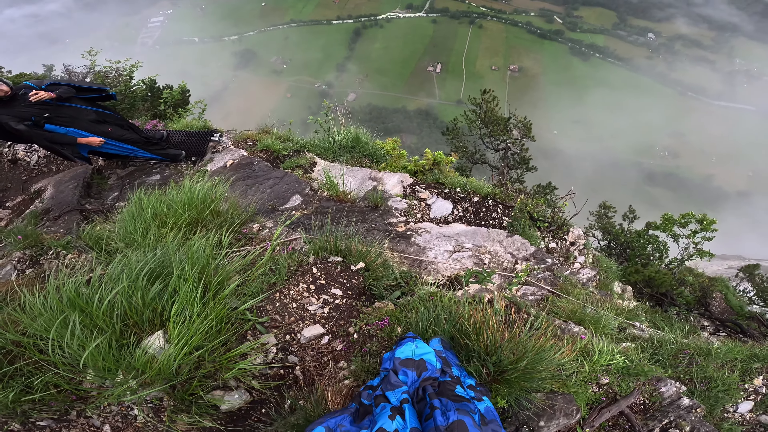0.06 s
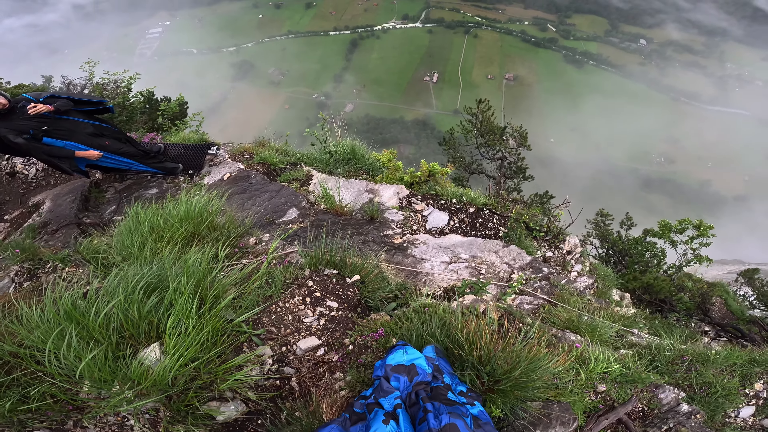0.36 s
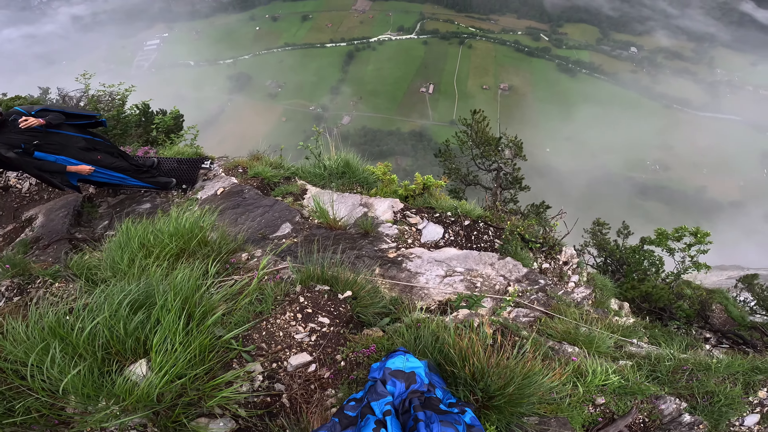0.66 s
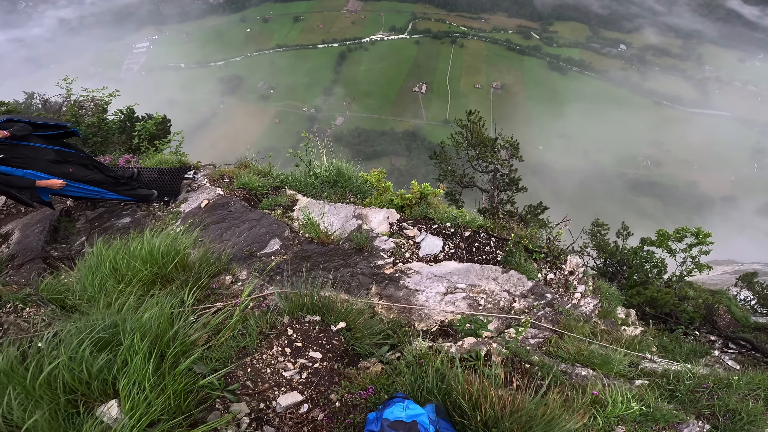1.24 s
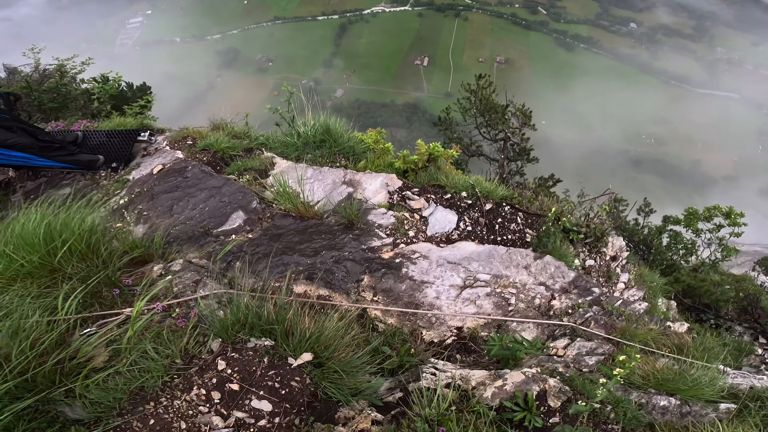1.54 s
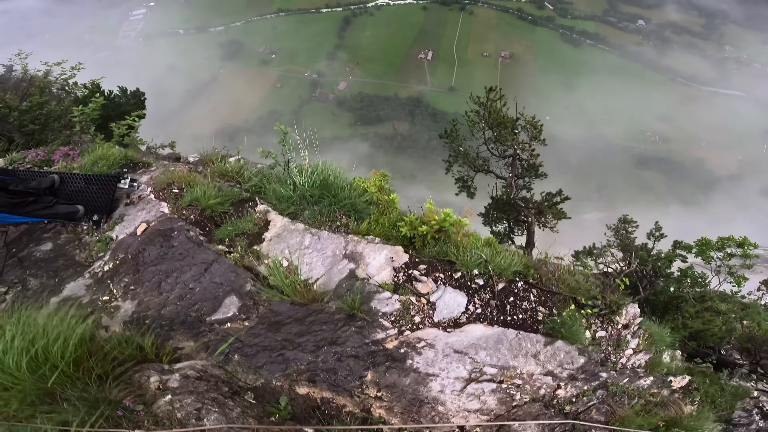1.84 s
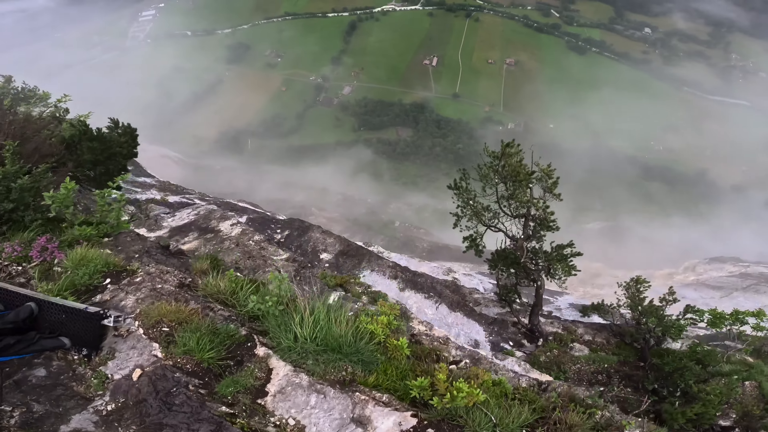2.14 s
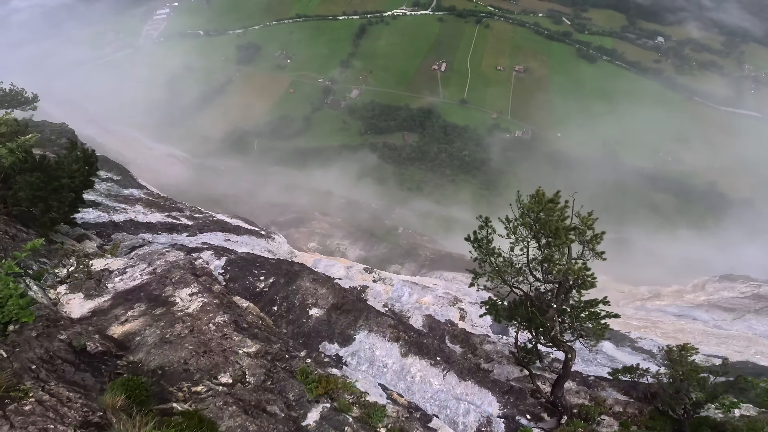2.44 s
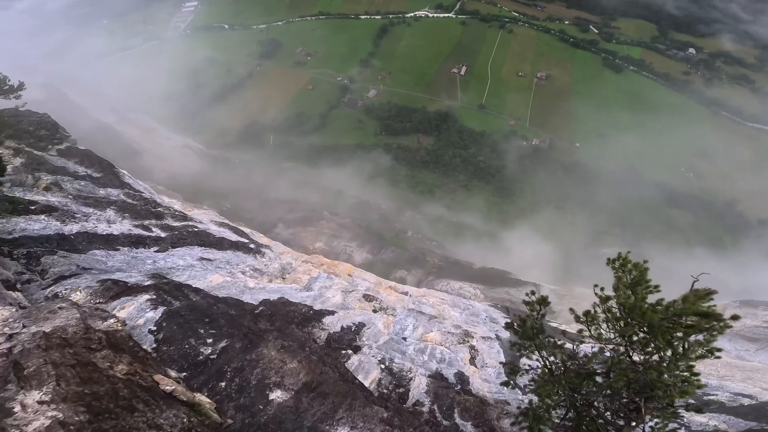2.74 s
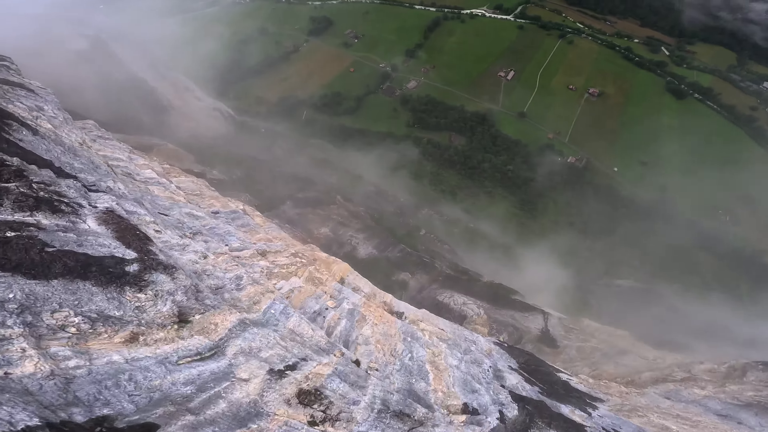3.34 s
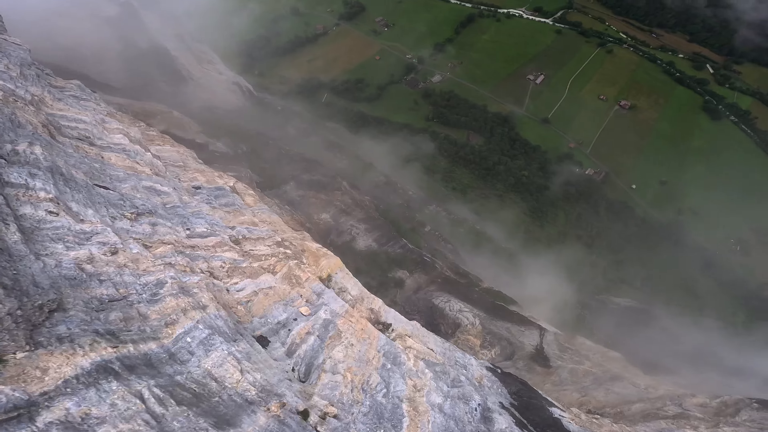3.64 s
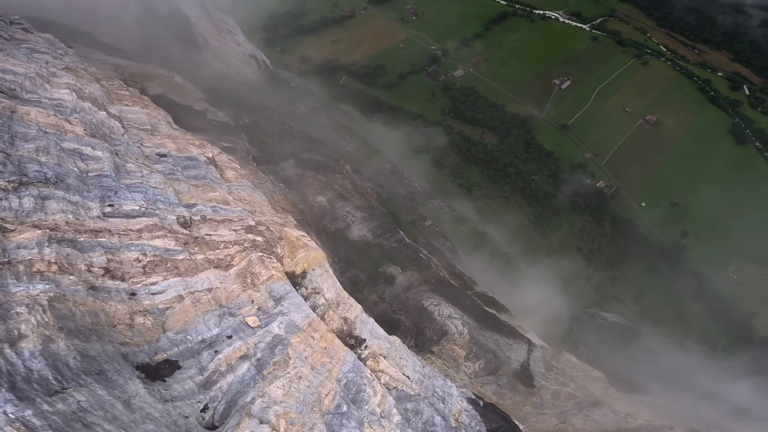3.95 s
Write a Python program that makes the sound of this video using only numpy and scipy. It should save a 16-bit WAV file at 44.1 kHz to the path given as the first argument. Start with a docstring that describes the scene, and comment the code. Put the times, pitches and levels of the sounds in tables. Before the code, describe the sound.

Wind rushes and buffets the microphone, building after footsteps and flapping suit fabric.

```python
"""Wind on a helmet microphone, worn by a jumper in a nylon suit who leaps from a cliff edge.
At the edge, the hush of the valley lies far below. Close by, cloth swishes, steps thud through
the body, a piece of gear clicks, and the suit flaps as it fills with air. Then the fall gathers
speed: eddies buffet the microphone, the rush grows louder and brighter, the image closes to mono."""
import sys
import numpy as np
from scipy import signal
from scipy.fft import rfft, irfft, next_fast_len
from scipy.io import wavfile
from scipy.ndimage import map_coordinates

SR = 44100
rng = np.random.default_rng(int(sys.argv[2]) if len(sys.argv) > 2 else 0)


def to_wav(sig):
    """Store sig (one row per channel, or 1-D mono) as 16-bit WAV at the path in sys.argv[1].

    Samples outside -1..1 are clipped; the rate is SR.
    """
    pcm = np.clip(np.atleast_2d(sig), -1, 1) * 32767
    pcm = np.round(pcm).astype(np.int16)
    wavfile.write(sys.argv[1], SR, pcm.T)  # frames by channels


N = 176400

# likeness of the two channels for valley, cloth and grit (f/Hz, correlation)
NEAR_MONO = [(30, 1), (1000, 0.87), (4000, 0.94), (8000, 0.9)]
# likeness of the two channels for wind at the microphone (f/Hz, correlation)
WIND_ALIKE = [(30, 1), (300, 0.71), (1000, 0.99), (4000, 1), (10000, .99)]


def amp(db):
    """Decibels to gain."""
    return 10 ** (np.asarray(db) / 20)


def unit(x):
    """Scale to rms 1."""
    return x / np.sqrt(np.mean(x ** 2) + 1e-20)


def along(points, hz):
    """Interpolate (f/Hz, value) points on a log frequency axis."""
    f, v = np.transpose(points)
    return np.interp(np.log(hz + 1), np.log(f + 1), v)


def curves(rows):
    """One value per sample for each column after the time."""
    times, *columns = np.transpose(rows)
    return [np.interp(np.arange(N) / SR, times, column) for column in columns]


def filtered(x, response):
    """Shape the spectrum of x by a response, a function of frequency."""
    size = next_fast_len(N + 8192)
    hz = np.fft.rfftfreq(size, 1 / SR)
    return irfft(rfft(x, size) * response(hz), size)[..., :N]


def rush(spectrum, alike):
    """Coloured stereo noise of rms 1; alike sets the left-right correlation."""
    def response(hz):
        angle = np.arccos(np.clip(along(alike, hz), -1, 1)) / 2
        return amp(along(spectrum, hz)) * [np.cos(angle), np.sin(angle)]
    mid, side = filtered(rng.standard_normal((2, N)), response)
    return unit(np.array([mid + side, mid - side]))


def churn(depth_db, rate):
    """A smooth random gain of rms 1, with rate knots a second."""
    knots = rng.standard_normal(int(N * rate / SR) + 4)
    wobble = map_coordinates(knots, [np.arange(N) * rate / SR])
    return unit(amp(depth_db * wobble))


def burst(t, attack_s, t60_s):
    """A quick rise and an exponential decay."""
    return (1 - np.exp(-t / attack_s)) * amp(-60 * t / t60_s)


def pan(right_db):
    """Left and right gains with a mean of 1."""
    gains = amp(np.array([-right_db, right_db]) / 2).reshape(2, -1)
    return gains / gains.mean(0)


def add(track, s, sound):
    """Mix a sound into a track at time s."""
    part = track[..., round(s * SR):][..., :sound.shape[-1]]
    part += sound[..., :part.shape[-1]]


def valley():
    """Air and water far below the edge reach the microphone as a hush."""
    # swell of the hush (t/s, level/dB)
    swell = [(0, -49.5), (.3, -45.5), (1.0, -43), (1.6, -41), (1.95, -42.5), (2.15, -45), (2.4, -42),
             (4, -43)]
    # spectrum of the hush (f/Hz, level/dB)
    spectrum = [(60, -21), (200, 3.5), (400, -0.5), (600, -1), (1200, -3.5), (1800, -11), (2500, -22.5),
                (4000, -40.5), (8000, -54), (14000, -67)]
    level_db, = curves(swell)
    return amp(level_db) * rush(spectrum, NEAR_MONO) * pan(right_db=2)


def suit():
    """Just below the helmet, nylon rubs in a grainy swish, slides brightly or snaps at a crease."""
    # rubbing of the suit (t/s, relative level/dB)
    rubbing = [(0, -67.5), (.12, -63), (.21, -61), (.26, -62), (.38, -63.5), (.43, -64.5), (.475, -69.5),
               (.535, -60), (.575, -61), (.685, -54.5), (.78, -69), (.83, -65.5), (.87, -78), (.94, -78),
               (.99, -64), (1.14, -63.5), (1.21, -59), (1.29, -61), (1.55, -48), (1.8, -54.5), (1.97, -56),
               (2.02, -65), (2.09, -58), (2.2, -66.5), (2.33, -75), (2.6, -70)]
    # creases snapping (t/s, level/dB)
    creases = [(.69, -45), (.810, -51), (1.213, -49), (1.841, -49), (2.151, -44)]
    # quick slides of nylon on nylon (t/s, level/dB, half length/s)
    slides = [(0.212, -61.5, .016), (0.434, -63, 0.009), (.535, -58, .012), (1.505, -56, .008),
              (1.555, -56.5, .02), (2.098, -76, 0.014)]
    # spectrum of rubbing and creases (f/Hz, level/dB)
    cloth_spectrum = [(100, -5), (300, 20), (800, 4.5), (1500, 7.5), (2500, 6.5), (4000, 2), (6000, -1),
                      (7600, -2.5), (8400, -8.5), (10500, -13.5), (12500, -18), (15000, -31)]
    # spectrum of the slides (f/Hz, level/dB)
    slide_spectrum = [(2500, -31), (5000, -7), (6600, 4), (8300, -10), (10300, -6.5), (12000, -22),
                      (15000, -49)]
    rub_db, = curves(rubbing)
    snaps, t = np.zeros(N), np.arange(N) / SR
    for s, db in creases:
        add(snaps, s, amp(db) * burst(t[:SR // 10], attack_s=0.00092, t60_s=0.018))
    swish = amp(rub_db + 7.5) * churn(depth_db=1, rate=70) * churn(depth_db=1, rate=430)
    sliding = sum(amp(db) * np.exp(-0.5 * ((t - s) / half) ** 2) for s, db, half in slides)
    cloth = (swish + snaps) * rush(cloth_spectrum, NEAR_MONO)
    return (cloth + sliding * rush(slide_spectrum, NEAR_MONO)) * pan(right_db=-1.5)


def steps():
    """Each step sends a dull thud through the body to the helmet; grit scuffs under the sole."""
    # steps and jolts of the body (t/s, level/dB, f/Hz)
    jolts = [(.575, -22, 85), (0.646, -27, 111), (1.076, -22, 72), (1.383, -14, 59), (1.713, -7.5, 63),
             (1.936, -9.5, 63)]
    # scuffs of a shoe on the stony path (t/s, level/dB)
    scrapes = [(.646, -26.5), (.666, -34), (1.468, -38)]
    # spectrum of the grit (f/Hz, level/dB)
    grit_spectrum = [(100, -13), (350, 6.5), (900, -2), (1500, -4), (3000, -26), (8000, -41)]
    thuds, scuffs, t = np.zeros(N), np.zeros(N), np.arange(SR // 4) / SR
    for s, db, hz in jolts:
        add(thuds, s, amp(db) * burst(t, attack_s=0.0039, t60_s=0.095) * np.sin(2 * np.pi * hz * t))
    for s, db in scrapes:
        add(scuffs, s, amp(db) * burst(t, attack_s=0.0011, t60_s=0.026))
    return thuds * pan(right_db=7) + scuffs * rush(grit_spectrum, NEAR_MONO)


def gear():
    """A hard piece of gear clicks near the microphone and rings briefly."""
    # contacts of the gear (t/s, level/dB)
    clicks = [(1.7057, -12.5), (1.7104, -24)]
    # its ringing modes (f/Hz, relative level/dB, t60/s)
    modes = [(1410, 5.5, 0.012), (1650, -2.5, .009), (2460, -3.5, 0.0095), (2740, -6, 0.0067),
             (1050, -19, 0.006), (345, -10, 0.037)]
    attack_s = 0.0004
    out, t = np.zeros(N), np.arange(SR // 20) / SR
    ring = sum(amp(db - 60 * t / t60) * np.sin(2 * np.pi * hz * t) for hz, db, t60 in modes)
    contact = 1 - np.exp(-(t / (2 * attack_s)) ** 2)
    for s, db in clicks:
        add(out, s, amp(db) * contact * ring)
    return out


def flaps():
    """Cloth whips close on the right as the suit fills: each flap is a hollow pop with a puff of air."""
    # flaps of the suit (t/s, level/dB, top of the puff's band f/Hz)
    whips = [(1.957, -12, 640), (1.971, -11.5, 750), (1.977, -8, 443), (1.985, -13, 300), (1.998, -11, 607),
             (2.004, -11.5, 403), (2.027, -15.5, 620), (2.038, -11, 413), (2.049, -12.5, 696),
             (2.058, -16.5, 840), (2.066, -19.5, 1290), (2.074, -20.5, 850), (2.089, -19.5, 750),
             (2.107, -22, 453), (2.183, -24, 460), (2.239, -23, 604), (2.26, -27, 750), (2.272, -26.5, 800),
             (2.287, -24, 646)]
    pop_hz, pop_db = 278, 0.5
    puff_low_hz, puff_db, puff_width = 111, -4, 0.34
    out, t = np.zeros((2, N)), np.arange(SR // 10) / SR
    shape = burst(t, attack_s=0.00091, t60_s=0.044)
    shape_rms = np.sqrt(np.mean(shape ** 2))
    for s, db, top_hz in whips:
        hz = pop_hz * np.exp(0.12 * rng.standard_normal())
        pop = shape * np.sin(2 * np.pi * hz * t)
        band = signal.butter(4, [puff_low_hz, top_hz], 'band', fs=SR, output='sos')
        mid, side = signal.sosfilt(band, rng.standard_normal((2, 2 * len(t))))[:, len(t):]
        air = np.array([mid + puff_width * side, mid - puff_width * side])
        puff = unit(shape * air) * shape_rms
        add(out, s, amp(db) * (amp(pop_db) * pop + amp(puff_db) * puff))
    return out * pan(right_db=11.5)


def buffet():
    """Eddies thump on the microphone, from the right at the edge, quicker and head-on in the fall."""
    # push of the air (t/s, relative level/dB)
    push = [(0, -38.5), (.1, -46.5), (.52, -43), (.6, -34), (.75, -40), (.85, -35.5), (1.0, -43.5),
            (1.12, -34), (1.27, -42), (1.4, -33.5), (1.47, -30.5), (1.6, -32), (1.68, -26.5), (1.81, -38),
            (1.93, -17.5), (2.08, -21), (2.14, -28.5), (2.23, -23.5), (2.32, -32), (2.38, -24.5),
            (2.5, -21.5), (3.2, -19.5), (4, -17.5)]
    # side from which the eddies hit (t/s, right over left/dB)
    direction = [(0, 2), (1.6, 5), (2.15, 6), (2.45, 0)]
    # eddies shrink as the speed grows (t/s, power share of the quick ones)
    quick_share = [(0, .15), (2.35, 0.15), (2.5, 0.6), (4, 0.66)]
    # rumble of the slow eddies (f/Hz, level/dB)
    rumble = [(12, -7), (25, 0), (45, 1), (75, -6.5), (110, -13), (160, -14.5), (250, -24), (1000, -95)]
    # throb of the quick eddies (f/Hz, level/dB)
    throb = [(25, -11.5), (50, -1.5), (80, -0.5), (110, -1), (150, -9), (220, -14.5), (400, -45),
             (1000, -95)]
    push_db, = curves(push)
    right_db, = curves(direction)
    quick, = curves(quick_share)
    eddies = np.sqrt(1 - quick) * rush(rumble, WIND_ALIKE) + np.sqrt(quick) * rush(throb, WIND_ALIKE)
    rounded = unit(np.tanh(0.5 * eddies))
    return amp(push_db + 1) * rounded * pan(right_db)


def airflow():
    """Air rushes past the helmet, louder and brighter with speed; turbulence shakes its upper bands."""
    # airflow in the fall (t/s, then relative level/dB of roar, hiss and low body)
    fall = [(2.4, -61, -64, -38.5), (2.5, -47, -58.5, -44), (2.65, -41.5, -63.5, -32.5),
            (2.83, -36, -54.5, -34), (3.1, -34, -47.5, -30), (3.35, -32, -44.5, -29.5),
            (3.65, -33, -43, -26), (3.8, -32.5, -42, -24), (4.0, -31, -40, -25)]
    # spectrum of the low body (f/Hz, level/dB)
    body_spectrum = [(60, -26), (130, -2), (200, -3), (300, -5.5), (450, -12), (700, -17.5), (1500, -43.5),
                     (4000, -90)]
    # spectrum of the midrange roar (f/Hz, level/dB)
    roar_spectrum = [(150, -36), (400, 1.5), (700, 0.5), (1300, -1), (2000, -8), (3000, -13), (5000, -28),
                     (9000, -61)]
    # spectrum of the hiss (f/Hz, level/dB)
    hiss_spectrum = [(800, -21), (2000, 2.5), (3000, 3.5), (4500, -2), (6000, -7.5), (7500, -17.5),
                     (10000, -25), (14000, -65)]
    # spectrum of the fizz at the top (f/Hz, level/dB)
    fizz_spectrum = [(3000, -22), (5500, 1), (7200, 4), (8300, -5), (10500, -8), (12500, -21.5),
                     (15000, -40)]
    leap_s, onset_db_per_s = 2.31, 67  # the airflow fades in up to the leap
    full_fizz_db, fizz_growth = -51.5, 2.2  # the fizz rises faster than the hiss
    roar_db, hiss_db, body_db = curves(fall)
    onset = amp(onset_db_per_s * np.minimum(np.arange(N) / SR - leap_s, 0))
    body = amp(body_db + 1) * rush(body_spectrum, WIND_ALIKE)
    roar = amp(roar_db + 1.5) * rush(roar_spectrum, WIND_ALIKE) * churn(depth_db=0.56, rate=25)
    hiss = amp(hiss_db + 3) * rush(hiss_spectrum, WIND_ALIKE)
    fizz_db = full_fizz_db + fizz_growth * (hiss_db - hiss_db[-1])
    fizz = amp(fizz_db) * rush(fizz_spectrum, WIND_ALIKE)
    return onset * (body + (roar + hiss + fizz) * churn(depth_db=0.75, rate=300))


def scene():
    """All the sources at the helmet, from the distant valley to the wind on the microphone."""
    return valley() + suit() + steps() + gear() + flaps() + buffet() + airflow()


def record(dry):
    """The helmet camera: its image closes to mono in the strong wind, and its band limit cuts the top."""
    # width of the stereo image (t/s, side gain/dB)
    width = [(0, -6), (2.45, 1.5), (2.85, -6), (3.15, -20.5), (3.5, -60), (4, -70)]
    top_hz = 14900
    side_db, = curves(width)
    mid = dry.mean(0)
    return filtered(mid + amp(side_db) * (dry - mid), lambda hz: hz < top_hz)


dry = scene()
out = record(dry)
to_wav(out)
```